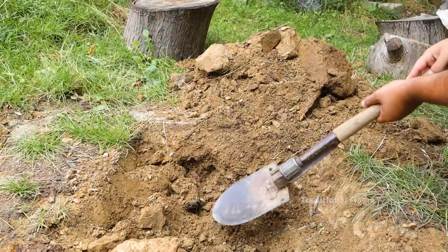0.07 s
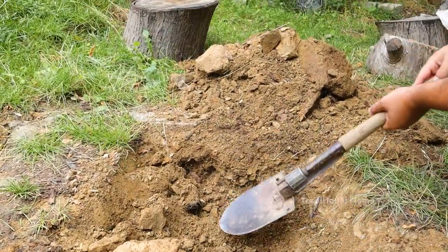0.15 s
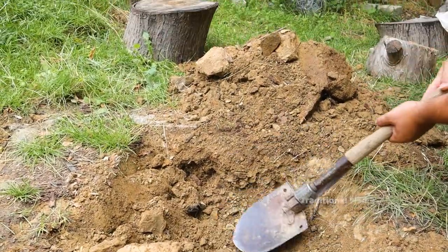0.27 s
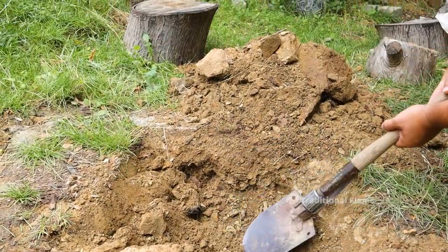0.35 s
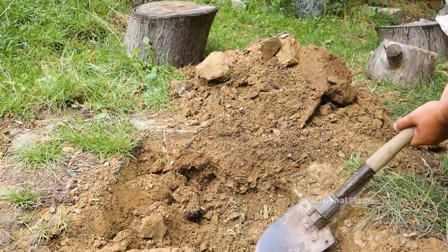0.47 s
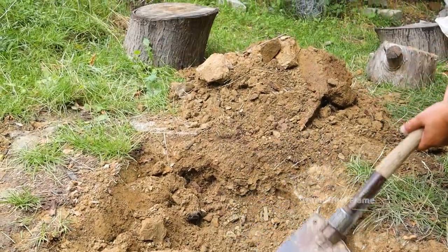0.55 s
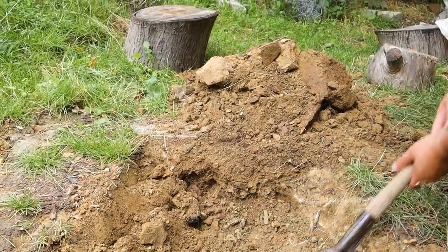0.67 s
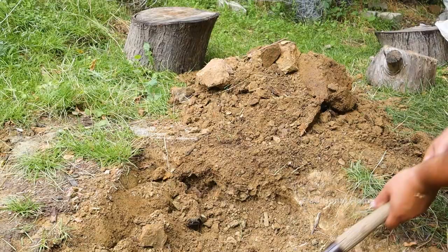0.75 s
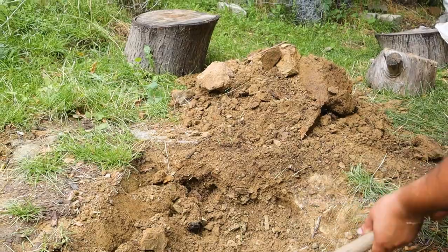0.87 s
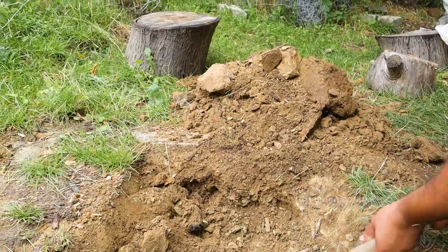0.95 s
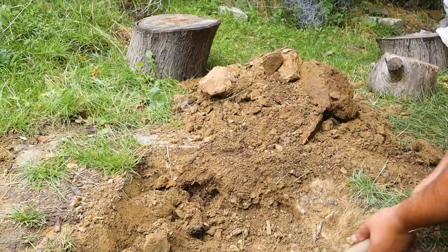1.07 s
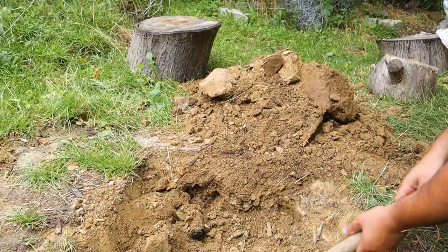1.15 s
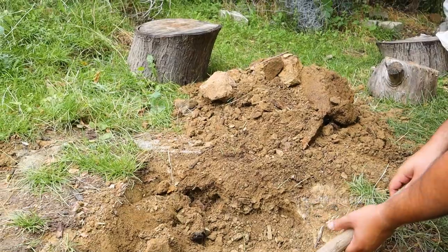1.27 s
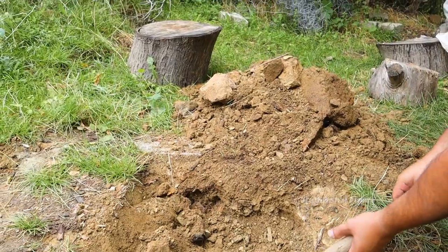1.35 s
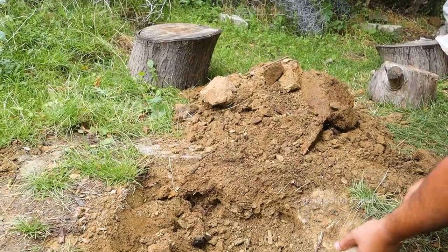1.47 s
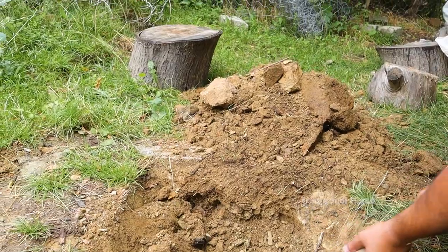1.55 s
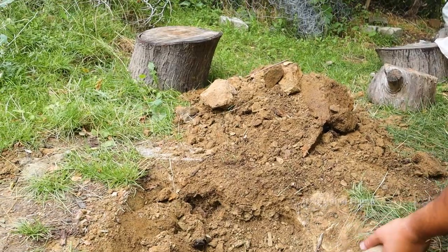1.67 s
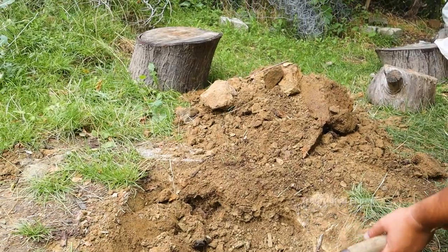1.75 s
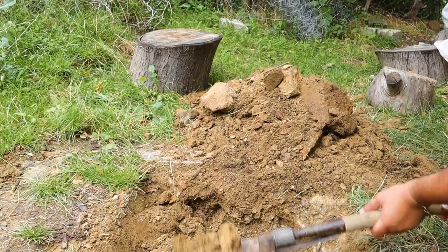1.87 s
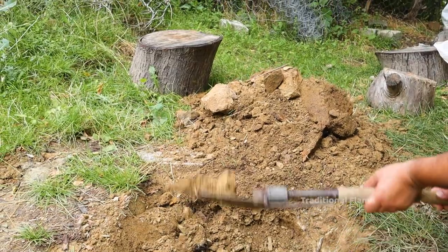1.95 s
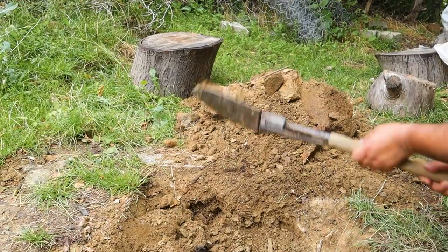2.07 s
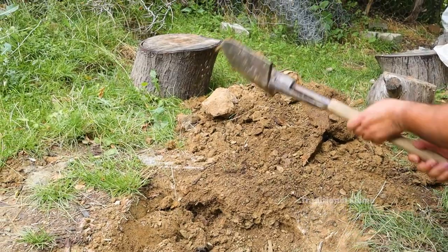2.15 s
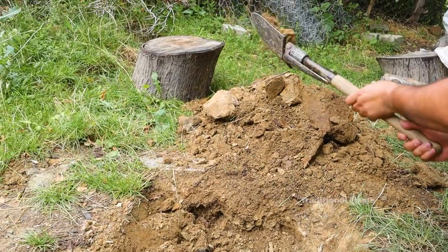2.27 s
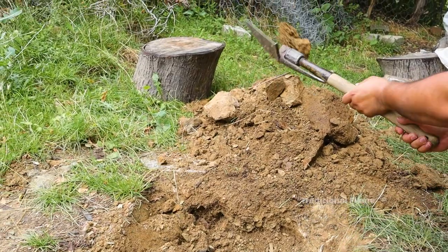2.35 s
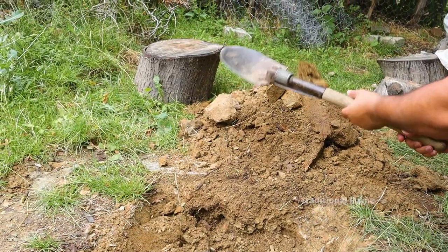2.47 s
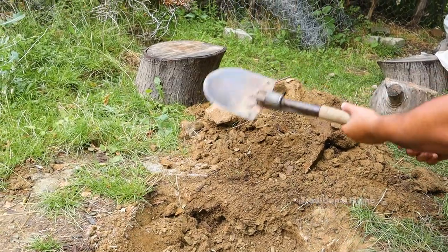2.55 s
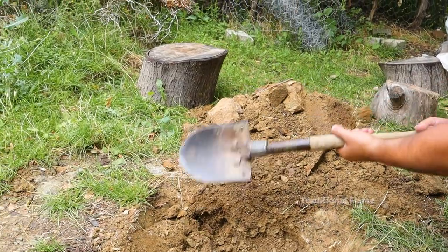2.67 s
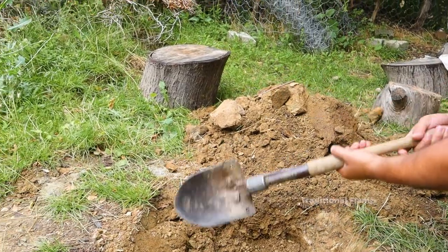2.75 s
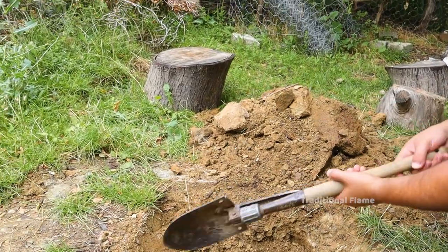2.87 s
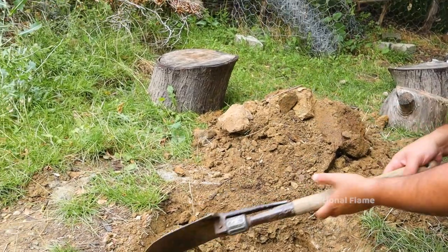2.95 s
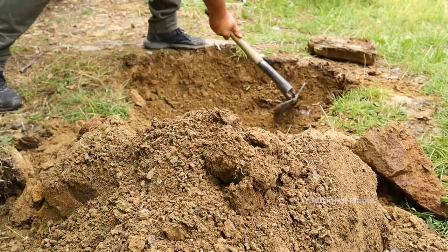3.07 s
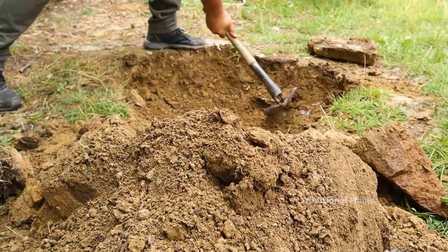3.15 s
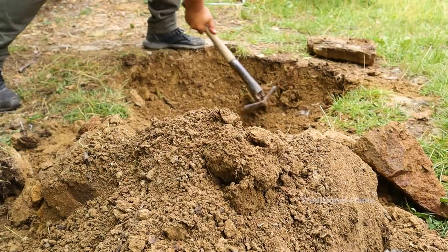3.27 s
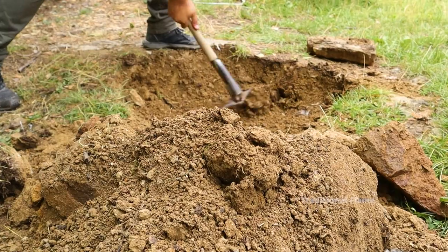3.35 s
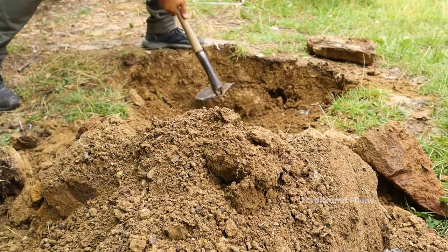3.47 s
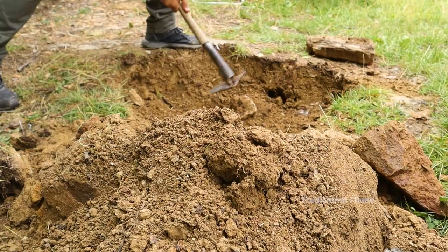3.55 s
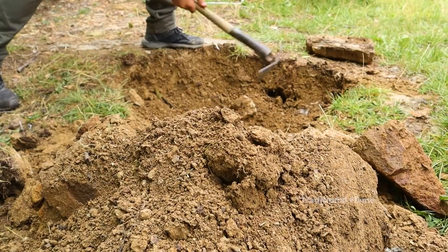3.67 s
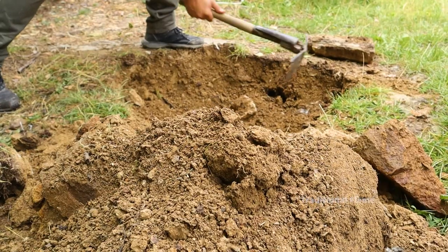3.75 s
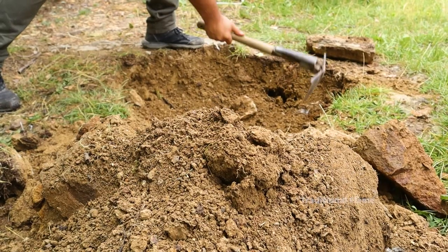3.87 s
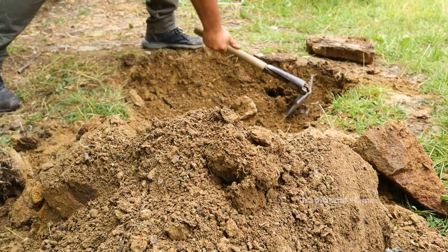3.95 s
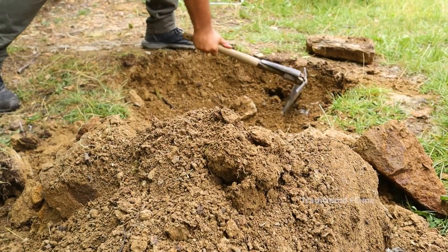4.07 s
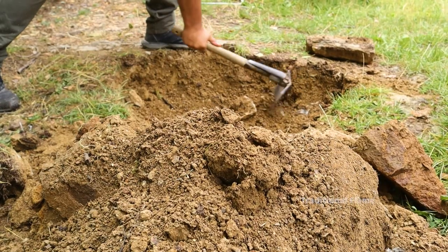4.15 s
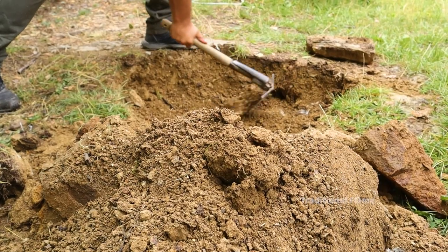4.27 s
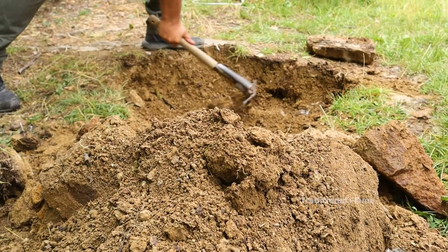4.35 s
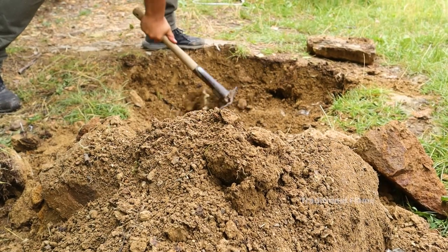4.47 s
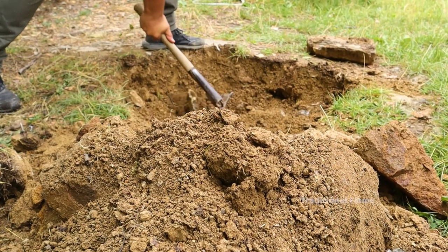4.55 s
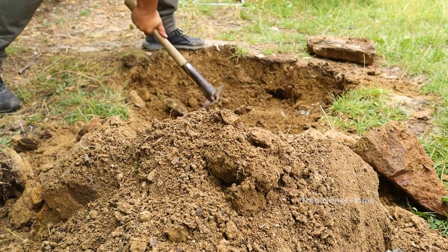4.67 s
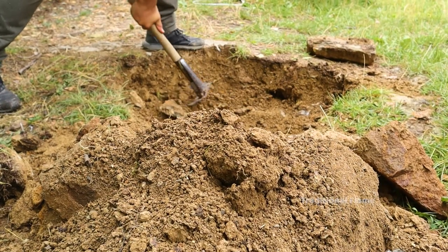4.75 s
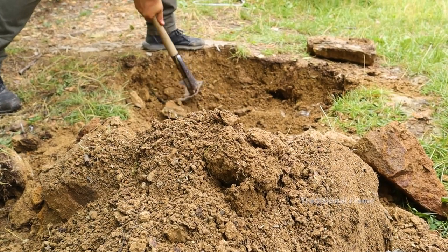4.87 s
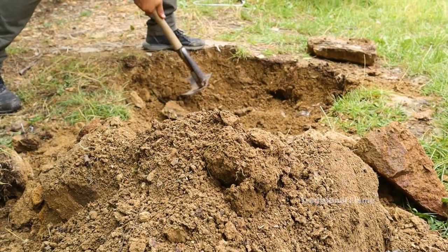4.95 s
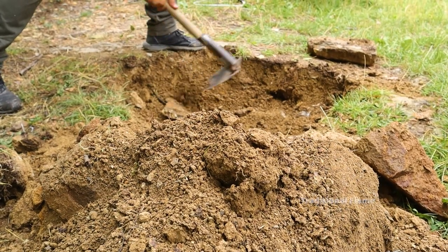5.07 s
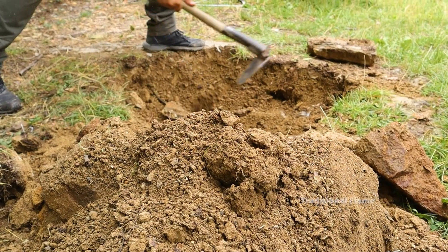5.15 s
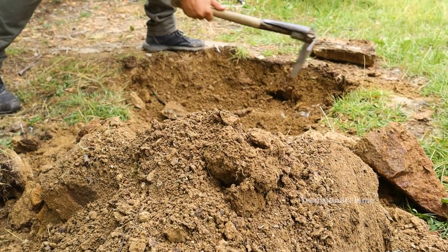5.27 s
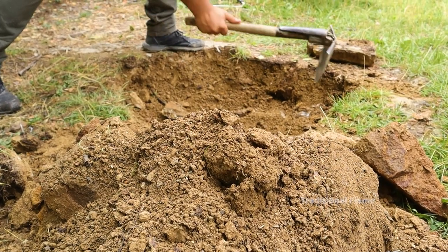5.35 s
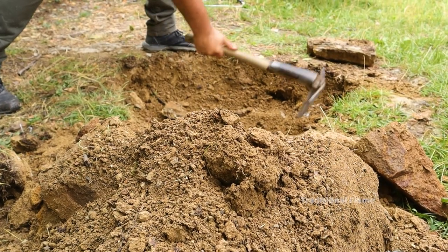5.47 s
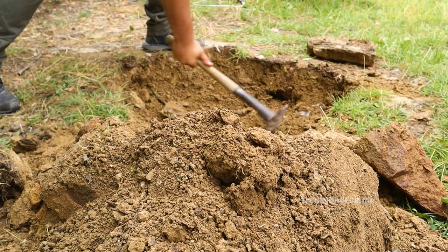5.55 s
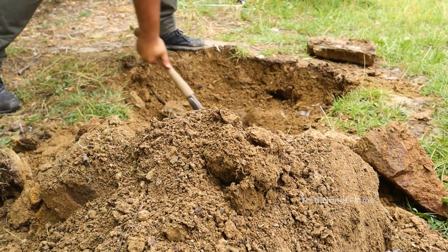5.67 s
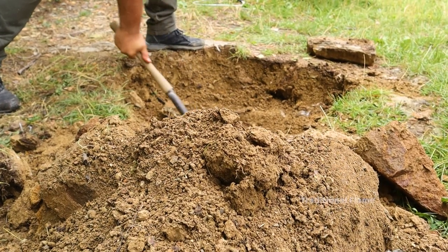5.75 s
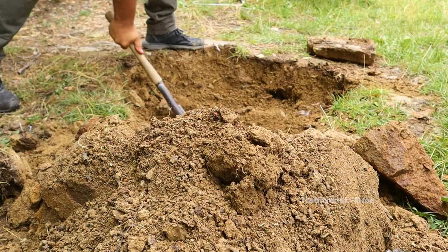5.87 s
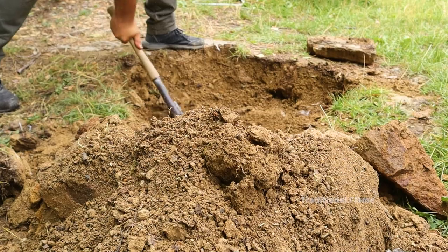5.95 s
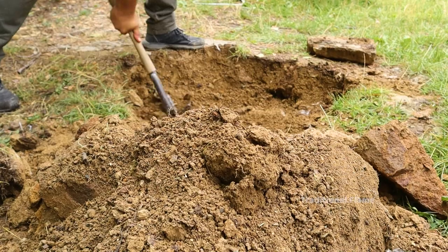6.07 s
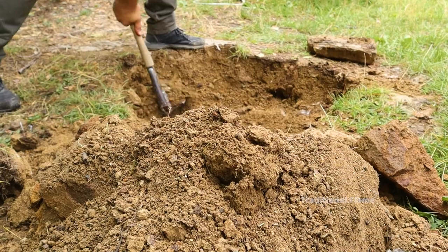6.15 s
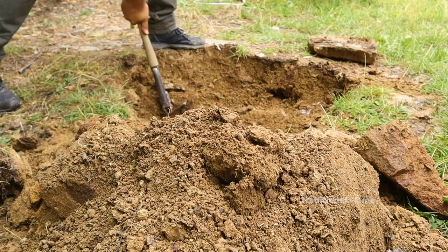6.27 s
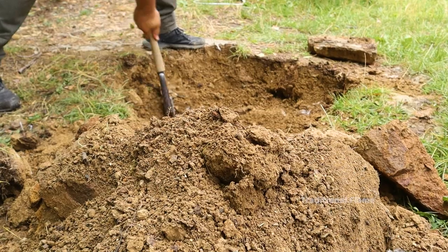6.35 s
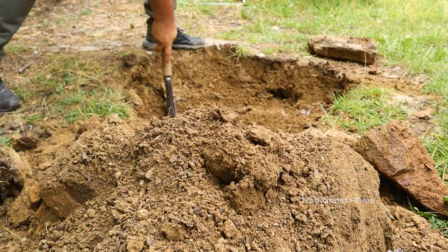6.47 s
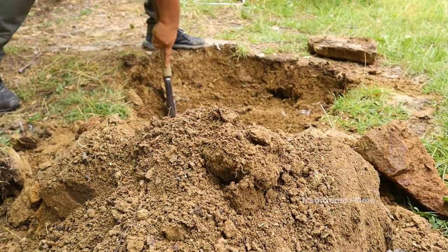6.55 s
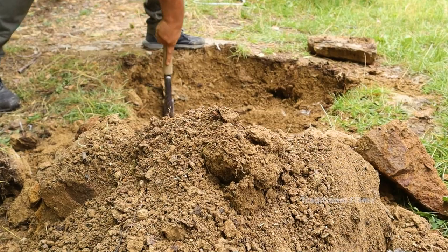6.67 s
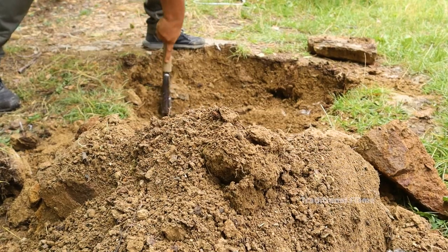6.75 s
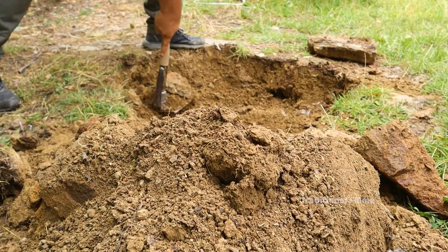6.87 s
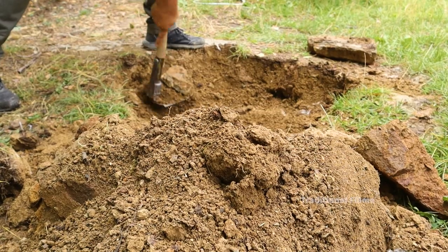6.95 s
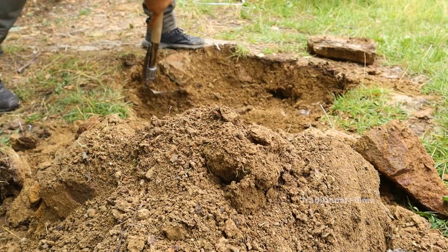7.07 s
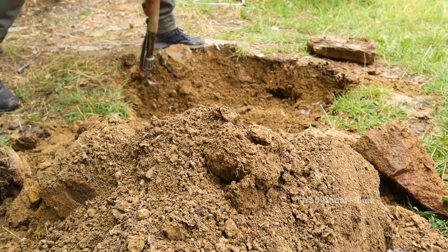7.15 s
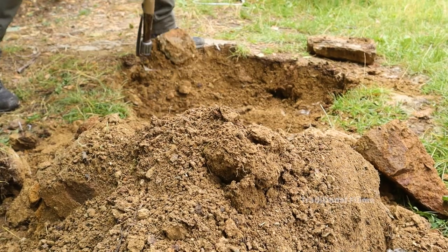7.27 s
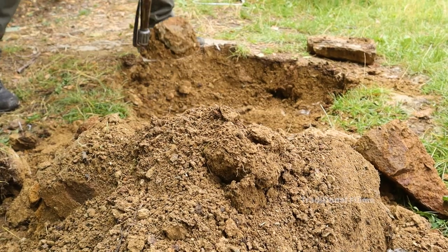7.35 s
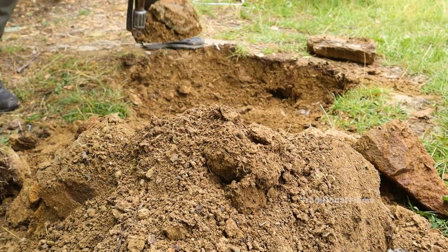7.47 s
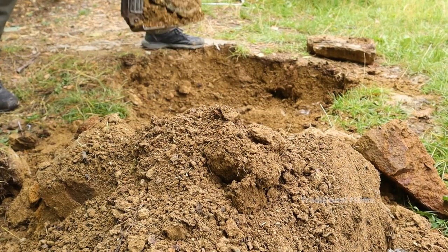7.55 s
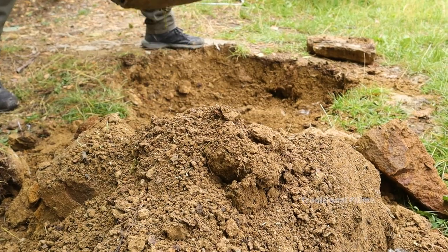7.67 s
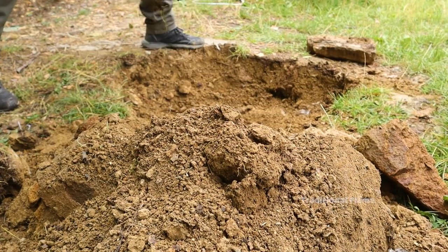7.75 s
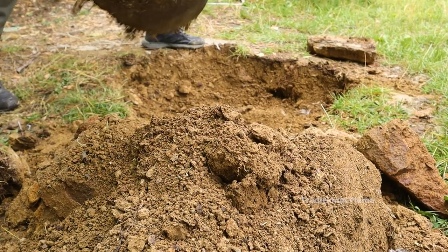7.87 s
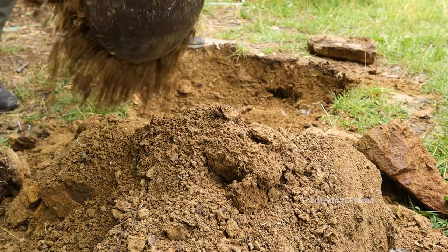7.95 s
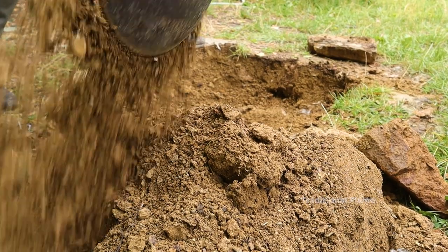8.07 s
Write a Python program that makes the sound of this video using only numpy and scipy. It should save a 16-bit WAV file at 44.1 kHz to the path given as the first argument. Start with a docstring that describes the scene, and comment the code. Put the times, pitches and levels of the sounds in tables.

```python
"""A folding steel shovel scoops dry stony soil and flings it on a heap, under a faint outdoor hiss.
Then, with its blade bent down like a mattock, it rakes and chops in a shallow pit; last, a bucket of
earth is tipped out. Every blow is a short burst of breaking grit that rings the blade; between blows
soil drags and trickles as a stream of random clicks. Damped sines give the handle and ground."""
import sys
import numpy as np
from scipy import signal
from scipy.fft import rfft, irfft
from scipy.io import wavfile
from scipy.ndimage import uniform_filter1d

SR = 44100
rng = np.random.default_rng(int(sys.argv[2]) if len(sys.argv) > 2 else 0)


def bounce(signal):
    """Save signal as a 16-bit WAV file at the path given by the first command-line argument."""
    frames = np.transpose(np.atleast_2d(signal))
    limited = np.clip(frames, -1, 1)
    pcm = np.round(limited * 32767).astype(np.int16)
    wavfile.write(sys.argv[1], SR, pcm)


N = 357651
TIME = np.arange(N) / SR
BINS = np.fft.rfftfreq(4096, 1 / SR)


def amp(db):
    """Level law: decibels to amplitude gain."""
    return 10 ** (np.asarray(db) / 20)


def evened(x):
    """Normalization: scales to rms 1."""
    return x / np.sqrt(np.mean(x ** 2) + 1e-20)


def colour(points, hz):
    """Spectral envelope: interpolates over log frequency to gains of mean power 1."""
    point_hz, point_db = np.transpose(points)
    return evened(amp(np.interp(np.log(hz + 1), np.log(point_hz), point_db)))


def causal(gain):
    """Minimum phase: the quickest impulse response with these gains, by folding the cepstrum."""
    cepstrum = irfft(np.log(np.maximum(gain, 1e-5)))
    half = len(cepstrum) // 2
    folded = np.r_[cepstrum[0], 2 * cepstrum[1:half], np.zeros(half)]
    return irfft(np.exp(rfft(folded)))[:half]


def add(mix, s, sound):
    """Superposition: mixes a sound in at time s."""
    part = mix[max(round(s * SR), 0):][:len(sound)]
    part += sound[:len(part)]


def registers(bass_hz=480, treble_hz=2500):
    """Band splitting: shares of bass, middle and treble at each frequency; they sum to 1."""
    bass = 1 / (1 + (BINS / bass_hz) ** 4)
    treble = 1 / (1 + (treble_hz / (BINS + 1)) ** 4)
    return bass, 1 - bass - treble, treble


# colour of the outdoor air: (frequency [Hz], density [dB per Hz])
AIR_COLOUR = [(12, -30.5), (20, -0.5), (129, -11.5), (325, -8), (670, -10.5), (1080, -10), (1380, -15),
              (1500, -13.5), (1680, -15), (2040, -15), (2770, -19.5), (4710, -19), (8940, -21.5),
              (11500, -24), (15600, -23)]
# drift of the outdoor air: (time [s], level [dB])
AIR_DRIFT = [(0, -50.5), (1.3, -51), (2.1, -52), (3, -51), (3.9, -55), (5.5, -53.5), (7, -54), (8.1, -55.5)]


def air(patchy_db=2.26):
    """Filtered noise: faint outdoor hiss whose level drifts in patches of time and frequency."""
    hz, _, spectrum = signal.stft(rng.standard_normal(N), SR, nperseg=2048)
    patches = uniform_filter1d(rng.standard_normal(spectrum.shape), size=20, axis=0)
    patches = evened(uniform_filter1d(patches, size=5, axis=1))
    shaped = spectrum * colour(AIR_COLOUR, hz)[:, None] * amp(patchy_db * patches)
    hiss = signal.istft(shaped, SR, nperseg=2048)[1][:N]
    return evened(hiss) * amp(np.interp(TIME, *np.transpose(AIR_DRIFT)))


def garden(x, t60=0.39, dull_hz=3500):
    """Diffuse scattering: heap, stumps and bushes return a dull tail of sparse random echoes."""
    t = TIME[:SR // 2]
    echoes = rng.standard_normal(len(t)) * (rng.random(len(t)) < 3000 / SR)
    echoes = echoes * amp(-60 * t / t60) * (t > .008)
    tail = signal.lfilter(*signal.butter(1, dull_hz, fs=SR), echoes)
    return signal.oaconvolve(x, tail / np.linalg.norm(tail))[:N]


# low thumps of the ground under heavy blows, and at 3.29 s a low scrape:
# (time [s], level [dB], pitch [Hz], t60 [s])
LOW_THUMPS = [(0.908, -23, 125, 0.082), (3.292, -30.5, 170, 0.15), (4.059, -13.5, 97, 0.041),
              (5.648, -32.5, 93.1, 0.17)]


def thumps():
    """Damped oscillation: each low thump or scrape swings for a few slow cycles and dies away."""
    out, t = np.zeros(N), TIME[:SR // 5]
    for s, db, hz, t60 in LOW_THUMPS:
        onset = 1 - np.exp(-2 * hz * t)
        add(out, s, amp(db - 60 * t / t60) * np.sin(2 * np.pi * hz * t) * onset)
    return out


# hollow knocks of the wooden handle: (time [s], level [dB], pitch factor [1])
HANDLE_KNOCKS = [(2.8436, -18.5, 1.05), (3.251, -30.5, 1.27), (3.284, -35, 1.5)]
# modes of the handle: (frequency before the pitch factor [Hz], relative level [dB], t60 [s])
HANDLE_MODES = [(127.2, -15, 0.047), (209, 8, 0.018), (515, 1.5, 0.059), (1200, -8.5, 0.019),
                (1780, -14, 0.019)]


def handle(contact_s=0.0025):
    """Modal synthesis: a dull blow with a soft contact rings the wooden shaft."""
    out, t = np.zeros(N), TIME[:SR // 6]
    for s, level_db, pitch in HANDLE_KNOCKS:
        ring = sum(amp(db - 60 * t / t60) * np.sin(2 * np.pi * hz * pitch * t)
                   for hz, db, t60 in HANDLE_MODES)
        add(out, s, amp(level_db) * ring * (1 - np.exp(-t / contact_s)))
    return out


def grit(per_s, spread_db, cycles, chink_db, count=36):
    """Random impulse process: many small fractures and few large ones click and ring clods or pebbles."""
    size = amp(spread_db * np.minimum(rng.exponential(1, N), 4))
    clicks = size * rng.choice([-1, 1], N) * (rng.random(N) < per_s / SR)
    pebble, t = rng.integers(0, count, N), TIME[:SR // 30]
    chinks = np.zeros(N)
    # pebble pitches lie evenly in the square root of frequency
    for k, hz in enumerate(np.linspace(np.sqrt(160), np.sqrt(14000), count) ** 2):
        decay = np.exp(-t * (hz + 400) / cycles)
        ring = decay * np.sin(2 * np.pi * hz * rng.uniform(.94, 1.06) * t)
        chinks += signal.oaconvolve(clicks * (pebble == k), evened(ring) * hz ** .25)[:N]
    return evened(evened(clicks) + amp(chink_db) * evened(chinks))


# strokes in which soil is dragged by the blade or slides loose:
# (start [s], length [s], relative level [dB], thud added to the bass [dB], hardness added to the treble [dB],
#  swell from start to end [dB]: up as soil piles before the blade, down as it runs off)
SOIL_STROKES = [(.29, .03, -45.5, 9, -8, 8), (.435, 0.0092, -40, 5, -1, 11), (.52, 0.18, -52, 5, 2.5, -8),
                (.725, 0.046, -27, -12, 2.5, 1.5), (.79, 0.043, -20, -1, 0, -2),
                (0.858, 0.049, -12.5, -4.5, -11.5, 8), (.94, .02, -24, -15, -10, 0.5),
                (1.02, 0.098, -45.5, -21, -21, 9), (1.197, .17, -39.5, -14, -31, 1),
                (1.62, 0.15, -39.5, -18, -12.5, 1), (1.865, 0.037, -36, 9.5, 0.5, -12),
                (2.245, 0.07, -50.5, -8, 8, 9), (2.58, 0.2, -47.5, 5.5, -5, -3),
                (3.122, 0.031, -34, 10.5, 1, 6), (3.248, 0.13, -44, 13, -8.5, 14),
                (3.385, 0.033, -24, 2, -2.5, 9), (3.479, 0.078, -49, 8, 9, -10),
                (3.58, .15, -55, 11.5, -11, -2), (4.062, 0.13, -44, -2, 2.5, -12),
                (4.198, 0.12, -30.5, 2.5, 1.5, 1.5), (4.41, 0.088, -27.5, 6.5, 1, 6),
                (4.53, 0.06, -33.5, -6, -1.5, 13), (4.795, 0.13, -25.5, -16, -5.5, 4),
                (5.038, 0.15, -64, 7, 19.5, 4), (5.662, 0.071, -30.5, -6, 1.5, 2.5),
                (5.75, 0.031, -24, -0.5, -4.5, 0), (5.852, 0.07, -28, -1.5, -1, -6.5),
                (5.94, 0.11, -38, 1.5, -4.5, 3.5), (6.12, .18, -41, -8.5, -4, 0.5),
                (6.37, .05, -41, -2, -3.5, -3), (6.46, 0.13, -59, 5, 2.5, -6), (6.84, .15, -59, 7, 2, 1),
                (7.978, 0.14, -35.5, -3.5, 2.5, 9)]
TRICKLE_DB, TRICKLE_THUD_DB, TRICKLE_HARD_DB = -64.5, 13, 0.5  # crumbs keep settling between strokes
GRIP_DB_PER_S, RUN_OUT_DB_PER_S = 636, 452.5  # pace at which every stroke takes hold and runs out


def soil_flow():
    """Power addition: bass, middle and treble gains over time, all strokes on top of the trickle."""
    trickle_db = TRICKLE_DB + np.array([[TRICKLE_THUD_DB], [0], [TRICKLE_HARD_DB]])
    power = np.ones((3, N)) * amp(trickle_db) ** 2
    for start, length, db, thud_db, hard_db, swell_db in SOIL_STROKES:
        near = slice(max(round((start - .2) * SR), 0), round((start + length + .4) * SR))
        t = TIME[near] - start
        grip = GRIP_DB_PER_S * np.minimum(t, 0)
        swell = swell_db * (np.clip(t / length, 0, 1) - .5)
        run_out = RUN_OUT_DB_PER_S * np.maximum(t - length, 0)
        tilt_db = np.array([[thud_db], [0], [hard_db]])
        power[:, near] += amp(db + (grip + swell - run_out) + tilt_db) ** 2
    return np.sqrt(power)


# colour of soil sliding: (frequency [Hz], density [dB per Hz])
SOIL_COLOUR = [(35, -59.5), (60, -32), (145, -7.5), (248, -10.5), (360, -5.5), (659, -7), (872, -5.5),
               (1390, -7), (1710, -9.5), (3600, -4.5), (6750, -6.5), (8720, -4.5), (10500, -17.5),
               (13900, -12.5), (15600, -19)]


def drag(flow, catch_db=4.5, catches_per_s=130, pebbles_db=-3):
    """Stick-slip friction: fine grains slip along the steel in clumps; larger pebbles chink among them."""
    catch = np.interp(TIME * catches_per_s, np.arange(N), rng.standard_normal(N))
    fines = grit(per_s=5000, spread_db=0.5, cycles=4.8, chink_db=3.0)
    pebbles = grit(per_s=520, spread_db=3.0, cycles=28, chink_db=17.5)
    grains = evened((fines + amp(pebbles_db) * pebbles) * amp(catch_db * catch))
    out = np.zeros(N)
    for share, gain in zip(registers(), flow):
        out += gain * signal.oaconvolve(grains, np.fft.fftshift(irfft(share)), "same")
    return signal.oaconvolve(out, causal(colour(SOIL_COLOUR, BINS)))[:N]


# modes of the steel blade, damped by the earth: (frequency [Hz], relative level [dB], t60 at sustain 1 [s])
BLADE_MODES = [(899, -14, 0.0966), (1155, -14, 0.042), (1420, -12, 0.39), (1714, -14, 0.058),
               (2210, -12.5, 0.087), (2470, -5.5, 0.081), (2930, -7, 0.14), (3430, -3.5, 0.13),
               (3540, -9.5, 0.1), (4200, -2.5, 0.069), (4360, -11.5, 0.1), (5000, 2.5, 0.052),
               (5390, 1.5, .08), (5900, 2.5, 0.061), (6330, -0.5, 0.024), (7100, -18, 0.15),
               (8210, 4.5, 0.078), (9100, -0.5, 0.049), (9620, -1, 0.025), (11240, -1, 0.06),
               (11900, -9.5, 0.068), (13950, -6, .08), (13600, 5.5, .08)]


def blade(force, sustain=1):
    """Modal resonance: the steel rings with the force it is given, longer when the earth damps it less."""
    t = TIME[:SR // 2]
    ring = sum(amp(db) * evened(amp(-60 * t / (t60 * sustain)) * np.cos(2 * np.pi * hz * t))
               for hz, db, t60 in BLADE_MODES)
    return signal.oaconvolve(force, ring / np.linalg.norm(ring))[:N]


# the blade is nearly clear of the earth and sings under grit sliding over it:
# (start [s], end [s], relative level [dB])
BLADE_LIFTS = [(0.425, 0.71, -19), (2.198, 2.367, -13), (3.463, 3.568, -20), (4.985, 5.213, -11.5),
               (6.08, 6.363, -16)]


def lifted(soil, soft_hz=5000):
    """Reduced damping: grit runs over the bare steel, too softly to wake its highest modes."""
    touch = sum(amp(db) * ((TIME > start) & (TIME < end)) for start, end, db in BLADE_LIFTS)
    rub = signal.lfilter(*signal.butter(2, soft_hz, fs=SR), touch * soil)
    return blade(amp(3) * rub, sustain=3)


def crunch(t, abruptness, t60, swell_db=15):
    """Force envelope: a sudden touch, a swell up to the stop at t = 0, then decay."""
    return amp(np.where(t < 0, swell_db * t * abruptness, -60 * t / t60))


# colour of stones breaking: (frequency [Hz], density [dB per Hz])
STONE_COLOUR = [(35, -61.5), (60, -33.5), (132, -13.5), (360, -5), (444, -10), (892, 1.5), (1420, -3),
                (1710, -3), (3780, -1), (4140, -3), (6150, -6.5), (8330, -4.5), (10500, -12), (13900, -7.5),
                (15600, -17)]


def strike(fractures, s, db, thud_db, hard_db, bite_s, ring_hz, t60, ring_db, ring_width_share=0.22, crack_db=13):
    """Source and resonator: crushed grit and one crack ring the struck piece; gives (start s, sound)."""
    stone, (bass, middle, treble) = colour(STONE_COLOUR, BINS), registers()
    start, end = s - min(1.5 * bite_s, .03), s + max(t60, .005)
    near = slice(round(start * SR), round(end * SR))
    t = TIME[near] - s
    push = crunch(t, 1 / bite_s, t60)
    force = evened(push * fractures[near]) * np.sqrt(np.mean(push ** 2))
    force[np.argmin(abs(t))] += amp(crack_db)  # the hard crack at the stop
    ground = stone * (amp(thud_db) * bass + middle + amp(hard_db) * treble)
    # the struck piece gathers the energy around its own pitch; the higher its peak, the longer it rings
    detune = 2 * (BINS / ring_hz - 1) * amp(ring_db) / ring_width_share
    ring = np.sqrt(1 + (amp(ring_db) ** 2 - 1) / (1 + detune ** 2))
    gain = ground * ring * np.linalg.norm(ground) / np.linalg.norm(ground * ring)
    return near.start / SR, amp(db) * signal.fftconvolve(force, causal(gain))


SNAG_DB, SNAG_SPREAD_DB = 2.5, 2  # relative to the middle register of the flow
SNAG_BITE_S, SNAG_T60_S, SNAG_RING_DB = 0.0015, 0.027, 13.5
SNAG_LOW_HZ, SNAG_HIGH_HZ = 897, 5830


def snags(fractures, flow, count=160):
    """Random impacts: small stones snag in the moving soil, about twenty a second, and follow its level."""
    out = np.zeros(N)
    for k, (when, size, pitch) in enumerate(rng.random((count, 3))):
        s = np.interp(k + when, [0, count], [.05, TIME[-1] - .05])
        bass_db, middle_db, treble_db = 20 * np.log10(flow[:, round(s * SR)])
        db = middle_db + SNAG_DB + SNAG_SPREAD_DB * (2 * size - 1)
        ring_hz = SNAG_LOW_HZ * (SNAG_HIGH_HZ / SNAG_LOW_HZ) ** pitch
        add(out, *strike(fractures, s, db, bass_db - middle_db, treble_db - middle_db,
                         SNAG_BITE_S, ring_hz, SNAG_T60_S, SNAG_RING_DB))
    return out


# loose pebbles drop and tick: (time [s], relative level [dB], hardness added to the treble [dB], ring [Hz])
PEBBLE_DROPS = [(0.417, -30.5, -6, 4300), (.9748, -21.5, -6, 2670), (1.2187, -33.5, 0, 8700),
                (1.5195, -19, 2, 2150), (1.9604, -31, -2, 8270), (2.063, -45.5, 12.5, 9300),
                (2.3587, -25.5, 4, 6640), (2.4727, -44.5, 7, 3530), (2.663, -31, 3, 8000),
                (4.147, -27.5, 3, 4500), (4.174, -19, -11, 4300), (6.0502, -23.5, -11, 4120),
                (7.5619, -39, -6.5, 6440)]
PEBBLE_BITE_S, PEBBLE_T60_S, PEBBLE_RING_DB, PEBBLE_THUD_DB = .0012, 0.011, 7.5, -2.5


def dropped_pebbles(fractures):
    """Short impact: each loose pebble ticks with a brief contact and rings at its own pitch."""
    out = np.zeros(N)
    for s, db, hard_db, ring_hz in PEBBLE_DROPS:
        add(out, *strike(fractures, s, db, PEBBLE_THUD_DB, hard_db,
                         PEBBLE_BITE_S, ring_hz, PEBBLE_T60_S, PEBBLE_RING_DB))
    return out


# the blade hits stones and clods; from 8.04 s earth tipped from a bucket lands. From 0.3 s the shovel is
# set down, driven through the soil and lifted; from 3.1 s it rakes lightly in the pit; from 4.06 s come the
# first chop, its rebound and the pull through the stones; from 5.65 s the second chop and pull, and a clod
# is prised out:
# (time of the stop [s], relative level [dB], thud added to the bass [dB], hardness added to the treble [dB],
#  swell before the stop [s], ring of the struck piece [Hz], t60 of the crushing [s], height of the ring [dB])
HARD_BLOWS = [ (0.315, -25.5, -3, -7.5, 0.0046, 2930, 0.024, 15.5),
              (0.4475, -18.5, 2, -15.5, 0.0067, 2320, 0.071, 9),
              (0.5145, -26, 0, 5, 0.0031, 2360, 0.033, 14), (0.698, -33.5, 4, 6, .01, 4380, .04, -19),
              (0.744, -14.5, -5, -6.5, 0.01, 2380, .045, 7),
              (0.7541, -16.5, 10.5, -1, 0.0068, 1000, 0.06, 12),
              (0.8065, -12, -6, -14, 0.0065, 880, 0.062, 8), (.8234, -9.5, -11, -2, 0.03, 846, 0.027, 12),
              (.8468, -7.5, -4, -9.5, 0.0054, 9000, .094, 18),
              (0.8646, -10, -18, -10, 0.0022, 8210, 0.1, 13), (0.873, -14, 6, -10, .002, 1080, .03, 3),
              (0.894, -24, -13, 10, 0.005, 1430, 0.036, 4), (0.901, 4, 9, -32, 0.0012, 1400, 0.02, 17.5),
              (.912, -8, -28, -7, .005, 9250, 0.14, 10), (.9356, -5, 1, -5.5, 0.0017, 1370, 0.025, 7.5),
              (1.8491, -22, -5, -11, .003, 5670, 0.056, 17),
              (2.6916, -28, -2, -5, 0.004, 2074, 0.055, 18.5),
              (3.1005, -29, 17.5, 5, 0.0017, 7700, 0.062, 13),
              (3.127, -26, 11, 9.5, 0.0026, 8210, 0.037, 5), (3.159, -22.5, 2, 1, 0.015, 3700, 0.037, 1),
              (3.211, -28, 14, 2.5, 0.011, 3760, 0.06, 7), (3.3564, -24.5, 10, 2.5, 0.012, 3570, 0.024, 11),
              (3.471, -22, -6, 4, 0.0016, 4330, 0.076, 10), (4.057, -2, 1, -0.5, 0.0076, 4200, 0.032, 3.5),
              (4.0858, -13.5, 2, 4.5, 0.0013, 4200, 0.036, 9),
              (4.1816, -9.5, -6, 1.5, 0.0026, 4090, 0.13, 13.5),
              (4.198, -6.5, -19, 1, 0.0045, 4690, 0.039, 20.5),
              (4.216, -15, 6.5, -0.5, 0.0048, 5390, 0.089, 11), (4.255, -25.5, 7, 7, .01, 5440, 0.025, 3),
              (4.2807, -22.5, 6, 7, 0.0026, 4360, 0.082, 3),
              (4.3254, -10, -10, -2.5, 0.0056, 4180, 0.038, 11),
              (4.3664, -15.5, 7, -20, .001, 1510, 0.026, 8), (4.3763, -26, 4, 3, .003, 1510, 0.072, 8),
              (4.3982, -14, -0.5, -15, 0.0023, 1090, 0.02, 5),
              (4.4542, -19, 6, -3, 0.0061, 7900, 0.066, 10), (4.5235, -16, 10, -2, 0.0011, 3590, 0.061, 6),
              (4.5675, -13.5, 3, 4, 0.0085, 3600, 0.039, 6.5),
              (4.5843, -23.5, -18, 6.5, 0.0037, 3900, 0.082, 9),
              (4.8117, -15.5, -18, -14, .012, 997, 0.034, 22),
              (4.843, -20, -16, -4, 0.0052, 1045, 0.026, 16),
              (5.0121, -32, 0, -2.5, 0.0045, 3600, 0.049, 11),
              (5.652, -14, 11.5, 11.5, 0.01, 4630, 0.047, 3),
              (5.6759, -13.5, 1, 6, 0.0035, 2930, 0.043, -5),
              (5.7016, -23, 10, 7.5, 0.0018, 1126, 0.044, 15.5),
              (5.743, -17, 9.5, -6, 0.0022, 1180, 0.095, 6), (5.8244, -29, -9, 11.5, 0.01, 5800, 0.075, 6),
              (5.8368, -8.5, -10, 2, 0.0019, 1304, 0.039, 14), (5.897, -26, 9, 3, 0.0018, 2950, 0.083, 19),
              (5.9537, -13.5, 7, 0, 0.0067, 5390, 0.052, 23.5),
              (6.1121, -33, 9.5, 4, 0.0033, 810, .034, 19), (6.442, -29, 10, -2.5, 0.0047, 2220, 0.042, 11),
              (7.0226, -34.5, 8, 2, 0.0085, 2950, 0.038, 7.5),
              (8.0402, -32, 2, 11, 0.0028, 5060, 0.046, 6.5), (8.06, -9, -12, 0.5, 0.006, 2040, 0.06, 10.5)]


def hard_blows(fractures):
    """Impact excitation: the edge, and at the end the falling earth, crushes grit and rings what it hits."""
    out = np.zeros(N)
    for row in HARD_BLOWS:
        add(out, *strike(fractures, *row))
    return out


def scene(low_cut_hz=80):
    """Superposition: blows and dragging soil, the ringing blade, handle, low thumps and open air."""
    flow = soil_flow()
    fractures = grit(per_s=14000, spread_db=6.0, cycles=2.06, chink_db=-3.5)
    blows = hard_blows(fractures) + dropped_pebbles(fractures) + snags(fractures, flow)
    soil = drag(flow)
    steel = blade(amp(-20.0) * blows + amp(-13.0) * soil) + lifted(soil)
    digging = amp(-3.0) * blows + amp(-2.0) * soil + steel + handle() + thumps()
    # such small sources radiate little deep bass
    digging = signal.lfilter(*signal.butter(2, low_cut_hz, "high", fs=SR), digging)
    return (digging + amp(-30.0) * garden(digging) + air())[None]


def record(dry, edge_hz=15800):
    """Overload and band limiting: the microphone clips peaks above full scale, then a low-pass follows."""
    clipped = np.clip(dry, -1, 1)
    low_pass = signal.firwin(511, edge_hz, window=("kaiser", 8), fs=SR)
    return signal.oaconvolve(clipped, low_pass[None], "same")


dry = scene()
out = record(dry)
bounce(out)
```